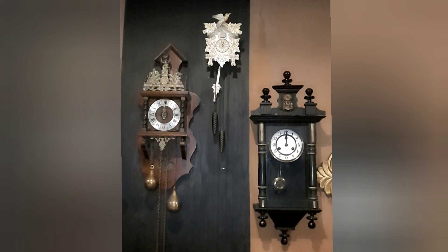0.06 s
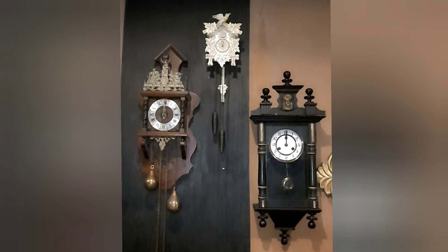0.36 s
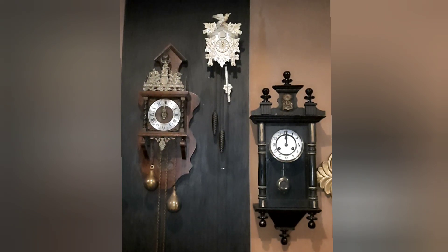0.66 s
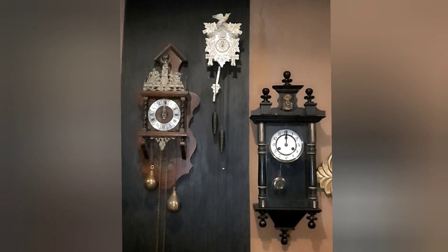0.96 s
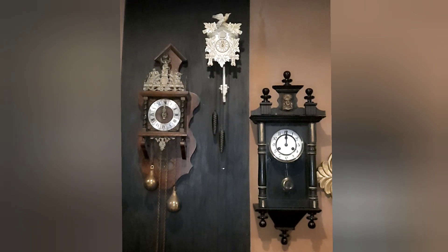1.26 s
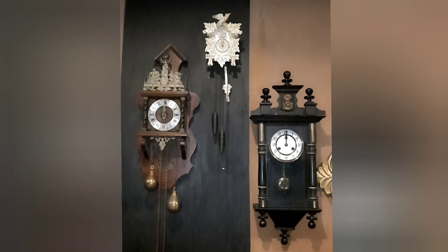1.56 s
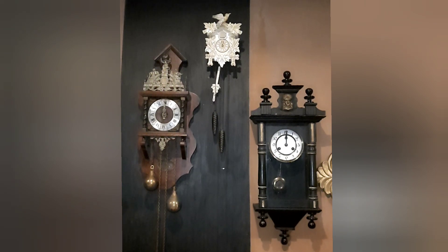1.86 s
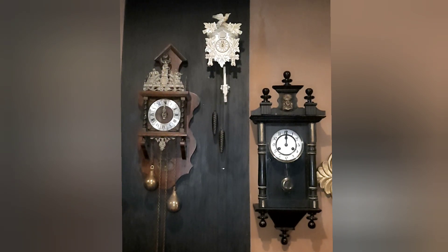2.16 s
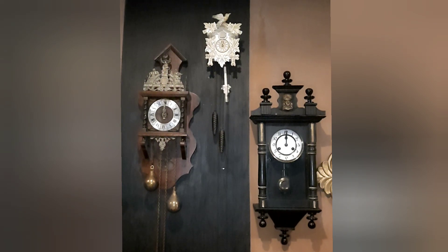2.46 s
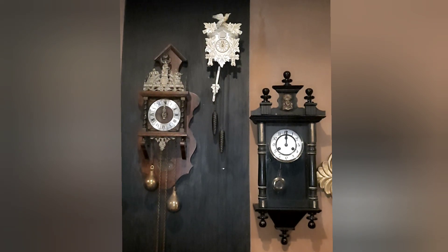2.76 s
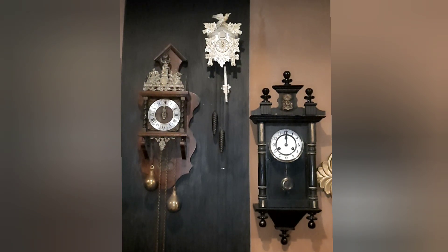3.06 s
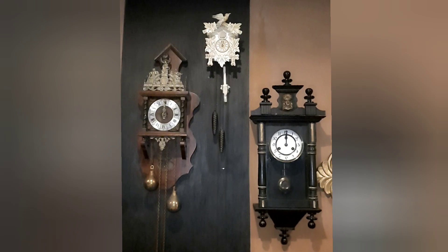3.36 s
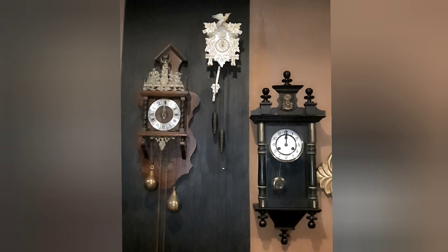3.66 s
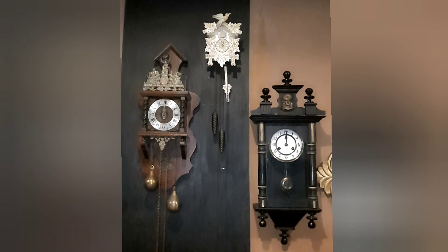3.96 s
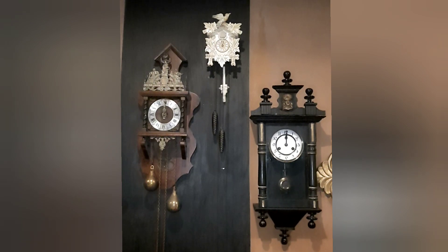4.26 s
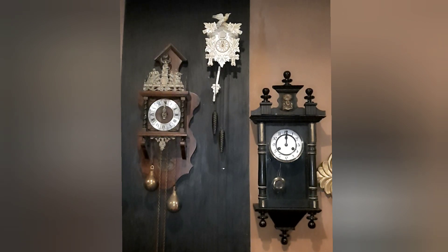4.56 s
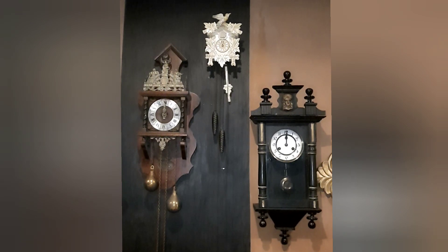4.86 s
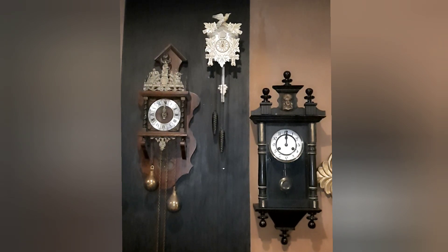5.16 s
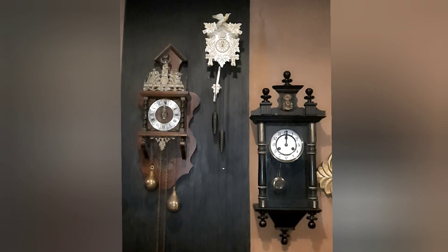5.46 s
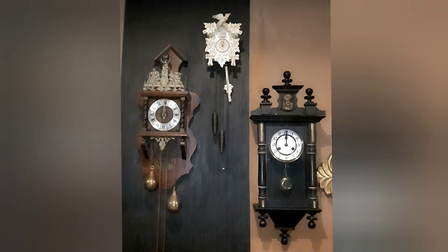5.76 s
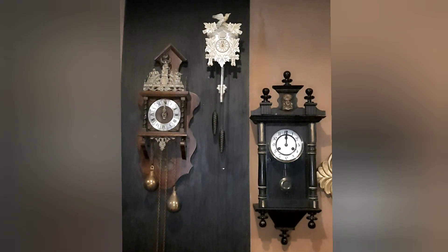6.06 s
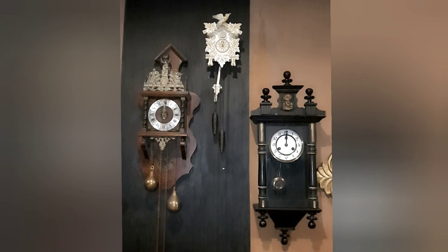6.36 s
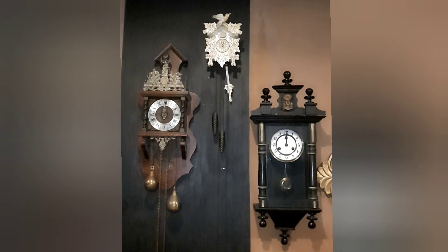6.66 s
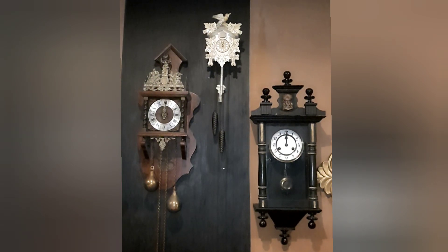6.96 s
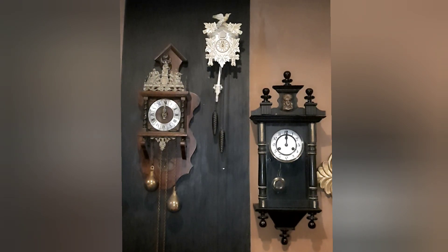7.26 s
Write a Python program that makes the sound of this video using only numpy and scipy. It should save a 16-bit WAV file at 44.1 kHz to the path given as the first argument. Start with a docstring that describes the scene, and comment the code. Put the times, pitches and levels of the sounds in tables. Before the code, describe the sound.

An antique wall clock is partway through striking the hour, heard from nearby in a small room with a short echo. At the start a faint high ring lingers from an earlier blow. The hammer then hits a small metal bell at about 0.4, 2.1, 3.7, 5.4 and 7.1 seconds, always on the same clear, bright pitch. Each strike begins with a sharp metallic crack, a quick clack as the hammer falls back and a brief knock from the wooden case. The note shimmers and wavers as it fades, still sounding when the next arrives. The last one is ringing when the sound ends at about 7.5 seconds. Much quieter, a pendulum keeps up a slightly limping tick-tock, a little over two ticks a second, and the gears whirr faintly, rising just before each blow. A steady low electrical hum and soft room air lie underneath throughout.

```python
"""A wall clock strikes the hour on a small metal bell, one blow every 1.7 s, in a room full of clocks.
The bell's partials are close pairs that beat; each blow also knocks the wooden case, and echoes pile up.
The strike train whirrs and a pendulum ticks on unevenly underneath, over a mains hum,
a faint beating drone and the low murmur of the room's air."""
import sys
import numpy as np
from scipy import signal
from scipy.fft import rfft, irfft
from scipy.io import wavfile

SR = 44100
rng = np.random.default_rng(int(sys.argv[2]) if len(sys.argv) > 2 else 0)


def transcribe(signal):
    """Save signal, clipped to [-1, 1], as a 16-bit WAV file at the path in sys.argv[1]."""
    frames = np.atleast_2d(signal).T
    limited = np.clip(frames, -1, 1)
    pcm = np.round(limited * 32767).astype(np.int16)
    wavfile.write(sys.argv[1], SR, pcm)


N = 322371
TIME_S = np.arange(N) / SR
RING_S = TIME_S[:2 * SR]
ROOM_T60_S = .5


def undb(db):
    """Decibels to gain."""
    return 10 ** (np.asarray(db) / 20)


def fade(t60_s):
    """Exponential decay over the length of one ring."""
    return np.exp(-np.log(1000) * RING_S / t60_s)


def pan(left_db):
    """Stereo gains, left_db louder on the left than on the right."""
    return undb(np.array([[left_db], [-left_db]]) / 2)


def unit_rms(x):
    """Scale to rms 1."""
    return x / np.sqrt(np.mean(x ** 2))


def add(out, sound, start_s):
    """Mix a sound in at start_s, clipped to the scene."""
    start = int(start_s * SR)
    first, end = max(start, 0), min(start + sound.shape[1], N)
    out[:, first:end] += sound[:, first - start:end - start]


def noise(size, colour, alike_hz=1, patchy_db=0):
    """Coloured stereo noise, rms 1; sides alike below alike_hz; patchy_db adds many small resonances."""
    bin_hz = np.arange(size // 2 + 1) * SR / size + 1
    hz, db = np.transpose(colour)
    colour_db = np.interp(np.log(bin_hz), np.log(hz), db)
    mid, side = rfft(rng.standard_normal((2, size)))
    alike = .97 / (1 + (bin_hz / alike_hz) ** 2)
    stereo = mid * np.sqrt(1 + alike) + np.array([[1], [-1]]) * side * np.sqrt(1 - alike)
    grid_hz = np.arange(0, SR / 2, 90)
    ripple_db = patchy_db * np.interp(bin_hz, grid_hz, rng.uniform(-1, 1, len(grid_hz)))
    return unit_rms(irfft(stereo * undb(colour_db + ripple_db), size))


def standing_wave(rise_s, scatter, spread_hz):
    """Echoes of a tone arrive in random phase and pile up to a standing wave of size 1 on each side."""
    decay = fade(ROOM_T60_S)
    echoes = rng.standard_normal((2, len(RING_S))) + 1j * rng.standard_normal((2, len(RING_S)))
    echoes = signal.sosfilt(signal.butter(2, spread_hz, fs=SR, output="sos"), echoes) * decay
    pile = np.cumsum(echoes, axis=1) / np.sqrt(2 * np.sum(decay ** 2))
    rise = 1 - np.exp(-RING_S / rise_s)
    settle = 1 - decay ** 2
    return rise + scatter * (pile - pile[:, -1:] * settle)


def bell_partial(split_hz, t60_s, left_db, right_db, twin_left_db, twin_right_db, twin_t60_s,
                 dip_s, lead_rad, rise_s):
    """Complex envelope of one partial: the bell is not quite round, so two close modes beat."""
    main = undb([[left_db], [right_db]]) * fade(t60_s)
    beat = np.exp(2j * np.pi * split_hz * (RING_S - dip_s))
    twin = undb([[twin_left_db], [twin_right_db]]) * fade(twin_t60_s) * beat
    left_lead = np.exp(1j * np.array([[lead_rad], [0]]))
    return (main - twin) * left_lead * standing_wave(rise_s, scatter=.65, spread_hz=700)


# Hammer blows. Each row: start in seconds, gain in dB of the two lowest partials as the blow
# meets their old ring.
BLOWS = [(-1.28, -2), (.398, -4), (2.060, 0), (3.745, .7), (5.422, -.7), (7.137, -3)]
# Bell partials. Each row: frequency in Hz, offset of the twin mode in Hz.
BELL_PITCHES = [(1308, 0), (3358.8, -2.15), (5882.04, 4.49), (8769, 2.5), (12000.2, 3), (14456, -58),
                (14690, 6), (15576.4, -6.1)]
# The same partials. Each row: T60 in seconds, left and right level in dB, twin's left and right level
# in dB, twin's T60 in seconds, beat dip time in seconds, left lead in radians, rise in seconds.
BELL_RINGS = [(13, -45.5, -46.8, -75, -75, 5, .3, 2.2, .03),
              (9.5, -32.5, -20.3, -44, -43, 6, .41, -.2, .012),
              (2.87, -21.5, -17.3, -24.5, -17.6, 2.95, .102, -.55, .06),
              (1.97, -17.4, -11.8, -26.5, -17.2, 1.4, .375, -1.9, .007),
              (.8, -4.6, -13, -20, -27, .6, .26, .5, .042),
              (.36, -24.5, -24.5, -29, -29, .36, .025, 1.2, .006),
              (.9, -47, -49, -55, -55, .8, .07, .5, .02), (.5, -6.3, -13.7, -15, -19.5, .5, .08, -.8, .017)]


def bell():
    """The struck bell, already ringing at the start; each blow takes over from the ring before it."""
    gaps_s = list(np.diff([start_s for start_s, _ in BLOWS])) + [RING_S[-1]]
    handovers = [np.exp(-np.maximum(RING_S - gap_s, 0) / .015) for gap_s in gaps_s]
    out = np.zeros((2, N))
    for index, ((hz, split_hz), row) in enumerate(zip(BELL_PITCHES, BELL_RINGS)):
        ring = bell_partial(split_hz, *row)
        envelope = np.zeros((2, N), complex)
        for (start_s, low_db), handover in zip(BLOWS, handovers):
            add(envelope, undb(low_db if index < 2 else 0) * ring * handover, start_s)
        out += np.imag(envelope * np.exp(2j * np.pi * hz * TIME_S))
    return out


def resonance(hz, width_hz):
    """Noise ringing in one resonance, rms 1."""
    return unit_rms(signal.lfilter(*signal.iirpeak(hz, hz / width_hz, fs=SR), rng.standard_normal(N)))


def mains_hum(hz=99.8):
    """A mains tone that wavers slightly."""
    tone = np.sqrt(2) * np.sin(2 * np.pi * hz * TIME_S)
    return undb(-40.4) * tone + undb(-64) * resonance(hz, width_hz=6)


# Steady low tones. Each row: frequency in Hz, level in dB.
DRONE_TONES = [(136, -62), (146.5, -56), (163.3, -66), (220, -64)]


def drone(pair_hz=294.3, pair_db=-56.8, beat_hz=1.33, crest_s=.53):
    """Faint low tones hang in the room; a close pair above them swells and fades as it beats."""
    tones = list(DRONE_TONES) + [(pair_hz, pair_db), (pair_hz - beat_hz, pair_db - 2.5)]
    return sum(undb(db) * np.sqrt(2) * np.sin(2 * np.pi * hz * (TIME_S - crest_s)) for hz, db in tones)


# Room and case resonances. Each row: frequency in Hz, width in Hz, level in dB before the band-pass.
HOLLOW_MODES = [(145, 10, -58.5), (224, 10, -68), (292, 14, -62), (322, 16, -61)]


def hollows():
    """The room and the clock cases ring faintly at a few low resonances."""
    modes = sum(undb(db) * resonance(hz, width_hz) for hz, width_hz, db in HOLLOW_MODES)
    return signal.sosfilt(signal.butter(2, [90, 450], "bandpass", fs=SR, output="sos"), modes)


# Room air spectrum. Each row: frequency in Hz, relative density in dB.
AIR_COLOUR = [(20, -33), (35, -19), (55, -7), (85, -1), (140, -2), (190, -7), (300, -5.5), (550, -7.5),
              (800, -16.3), (1400, -17.3), (2400, -28), (4200, -39), (10000, -44), (15000, -56)]


def air():
    """The room's air murmurs, low and steady."""
    return undb(-49.2) * noise(N, AIR_COLOUR, alike_hz=550) * pan(2.8)


# Strike train spectrum. Each row: frequency in Hz, relative density in dB.
WHIRR_COLOUR = [(800, -10), (2800, 3), (4000, -3), (5500, -2), (7500, 1), (9500, -2), (11200, 0),
                (12500, -8), (15500, -12)]


def strike_train(contacts_per_s=300, grain_s=.005, lift_s=.25):
    """The fly and its wheels rustle in fine grains, a little louder as the hammer lifts for a blow."""
    contacts = (rng.random(N) < contacts_per_s / SR) * rng.random(N)
    grains = signal.lfilter([1], [1, -np.exp(-1 / (grain_s * SR))], contacts)
    lift = np.zeros((1, N))
    for blow_s, _ in BLOWS[1:]:
        add(lift, np.linspace(0, 1, int(lift_s * SR))[None], blow_s - lift_s)
    return undb(-69 + 4.5 * lift) * unit_rms(.8 + grains) * noise(N, WHIRR_COLOUR) * pan(2.5)


# Tick spectrum. Each row: frequency in Hz, relative density in dB.
TICK_COLOUR = [(600, -12), (1500, -4), (3000, -1), (4500, -2), (6500, -2), (8000, 3), (9500, -7),
               (11000, -10), (12700, -7), (13600, -19), (16000, -25)]
# The two pallets, tick then tock. Each row: first drop in seconds, gain in dB.
PALLETS = [(.066, -52.8), (.429, -50.5)]


def escapement(period_s=.8761):
    """Pallets drop on the escape wheel in a limping tick-tock: each a short click, then mostly room."""
    size = SR // 2
    click, room_tail = undb(-2) * fade(.03), undb(-2.5) * fade(.6)
    envelope = (click + room_tail) * (1 - np.exp(-RING_S / .003))
    out = np.zeros((2, N))
    for first_s, db in PALLETS:
        for drop_s in np.arange(first_s, TIME_S[-1], period_s):
            add(out, undb(db) * noise(size, TICK_COLOUR, patchy_db=6) * envelope[:size], drop_s)
    return out * pan(1.5)


# Modes of the case, hammer and spring. Each row: frequency in Hz, level in dB, T60 in seconds.
CASE_MODES = [(295, -44, .5), (425, -49, .3), (1065, -36, .2), (1400, -39, .45), (1452, -31.5, .32),
              (1485, -33, .46), (1562, -42.5, .55), (2280, -47, .18), (2645, -46, .28), (2803, -42.5, .48),
              (2870, -46, .4), (3060, -41, .2), (4550, -41, .18), (4750, -44, .22), (6950, -46, .25),
              (9750, -41, .3), (10100, -43, .3)]


def case_knock():
    """A blow rings the wooden case; standing waves put left and right out of step."""
    lead_rad = np.array([[1.6], [0]])
    out = np.zeros((2, len(RING_S)))
    for hz, db, t60_s in CASE_MODES:
        tone = np.exp(1j * (2 * np.pi * hz * RING_S + lead_rad))
        out += undb(db) * fade(t60_s) * np.imag(tone * standing_wave(.005, scatter=.6, spread_hz=200))
    return out


def clatter(colour, rise_s, t60_s):
    """A short clatter of brass parts that swells and dies away."""
    envelope = fade(t60_s) * (1 - np.exp(-RING_S / rise_s))
    return noise(len(RING_S), colour, alike_hz=500, patchy_db=8) * envelope


# Spectra of the hammer's crack, its wash in the room and its rebound.
# Each row: frequency in Hz, relative density in dB.
CRACK_COLOUR = [(500, -24), (2500, -10), (5000, -6), (10000, -1), (15000, 0)]
WASH_COLOUR = [(150, -18), (300, -4), (750, -11), (1100, -8), (2000, -10), (3000, -5), (4000, -15),
               (4600, -10), (6500, -13), (8000, -9), (9800, -2), (11000, -3), (13000, 3), (15500, 2)]
REBOUND_COLOUR = [(100, -15), (400, -2), (800, -4), (1400, -2), (2200, -5), (3100, 3), (4000, -8),
                  (4550, 1), (5500, -10), (9000, -12), (15000, -14)]


def hammer(rebound_s=.0175, right_lag_s=.0003):
    """The hammer cracks on the bell, stirs case and room, then falls back on its stop with a clack."""
    knock = case_knock()
    wash = undb(-22.8) * clatter(WASH_COLOUR, rise_s=.008, t60_s=.31)
    rebound = undb(-22) * clatter(REBOUND_COLOUR, rise_s=.002, t60_s=.035)
    out = np.zeros((2, N))
    for blow_s, _ in BLOWS[1:]:
        left = undb(-10) * clatter(CRACK_COLOUR, rise_s=.002, t60_s=.022)[0]
        right = np.interp(RING_S - right_lag_s, RING_S, left)  # the clock stands to the left
        crack = np.stack([left, right])
        add(out, pan(5) * (crack + wash) + pan(2) * knock, blow_s)
        add(out, pan(4.5) * rebound, blow_s + rebound_s)
    return out


def scene():
    """The striking, ticking clock over the room's background."""
    clock = bell() + hammer() + escapement() + strike_train()
    room = pan(1.5) * (mains_hum() + hollows() + drone()) + air()
    return clock + room


def record(dry):
    """Steep low-pass at 15.9 kHz."""
    return signal.sosfilt(signal.ellip(10, .1, 80, 15900, fs=SR, output="sos"), dry)


dry = scene()
out = record(dry)
transcribe(out)
```